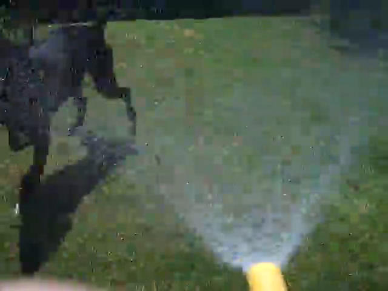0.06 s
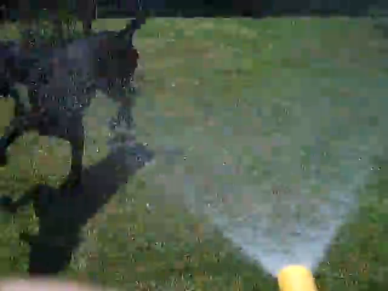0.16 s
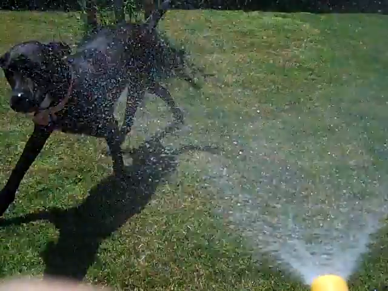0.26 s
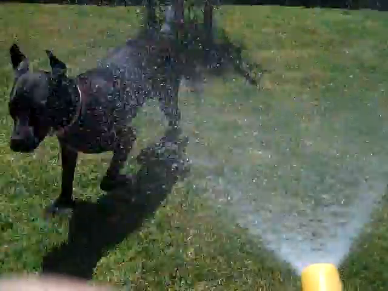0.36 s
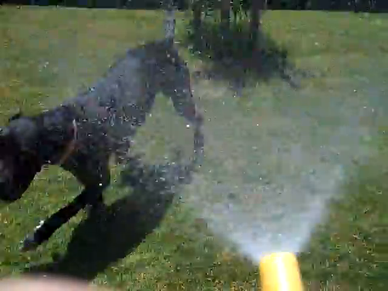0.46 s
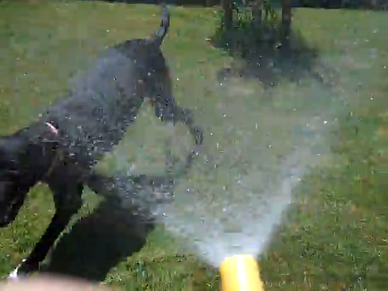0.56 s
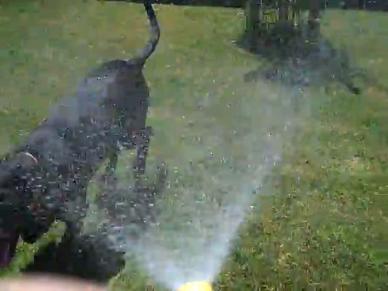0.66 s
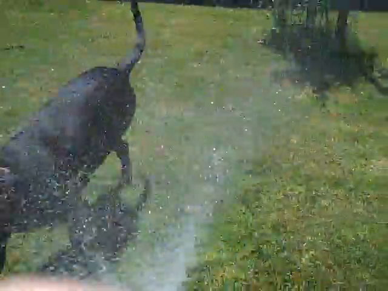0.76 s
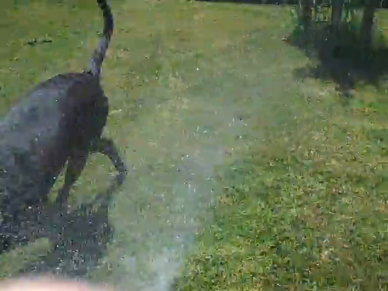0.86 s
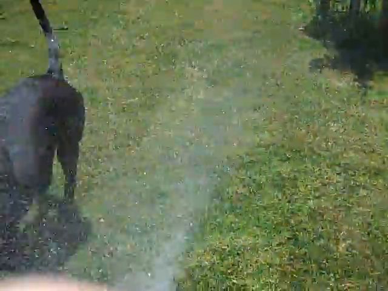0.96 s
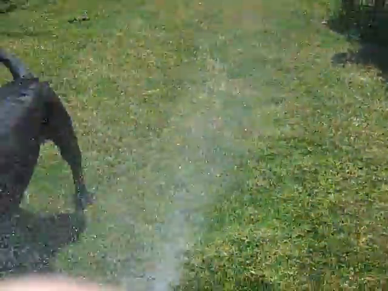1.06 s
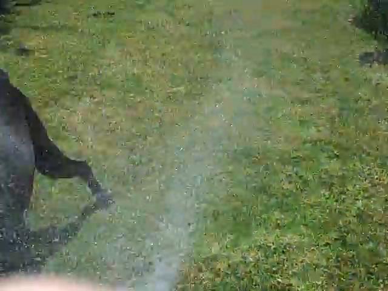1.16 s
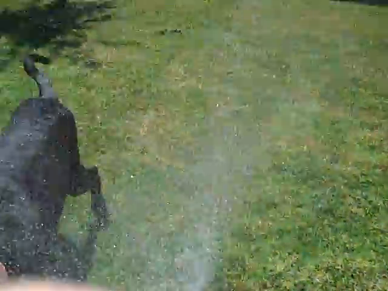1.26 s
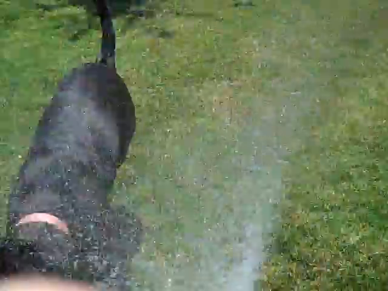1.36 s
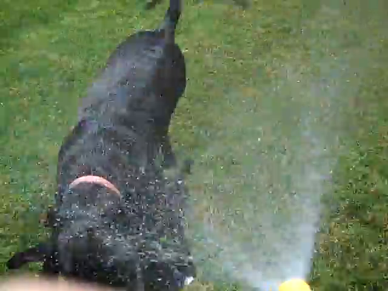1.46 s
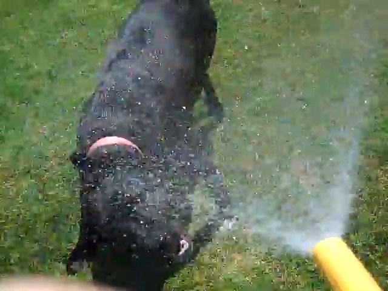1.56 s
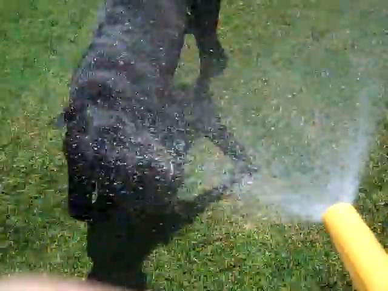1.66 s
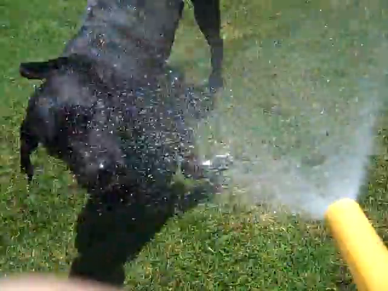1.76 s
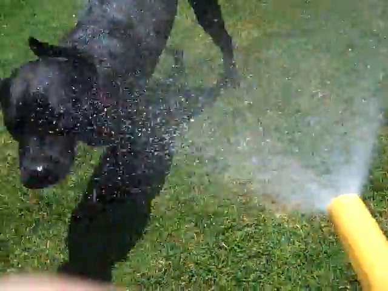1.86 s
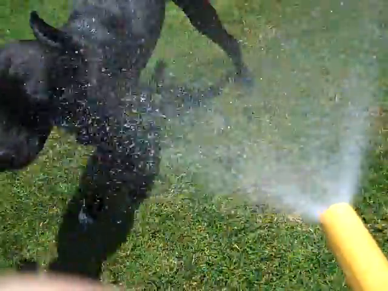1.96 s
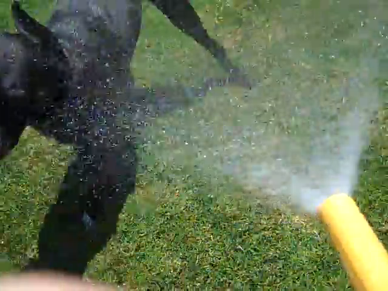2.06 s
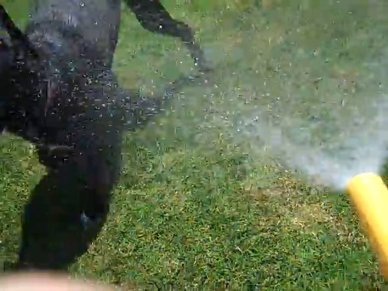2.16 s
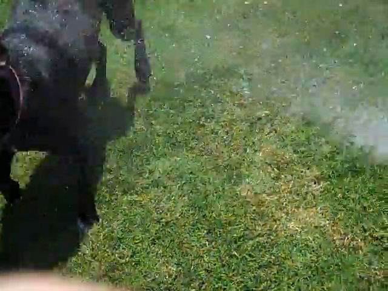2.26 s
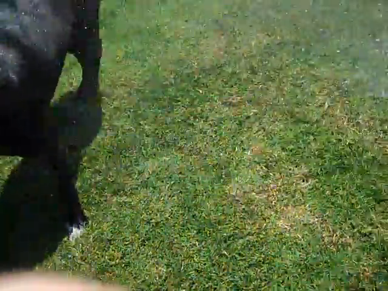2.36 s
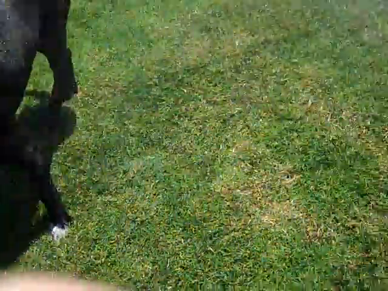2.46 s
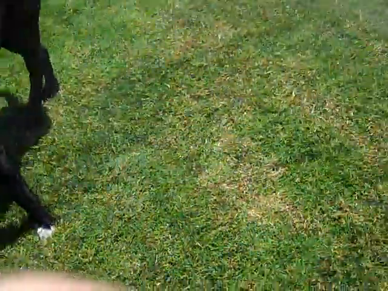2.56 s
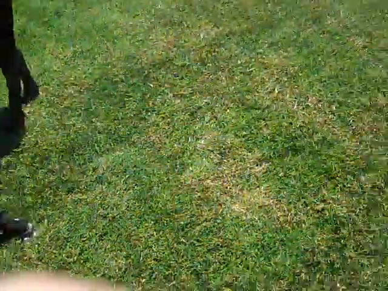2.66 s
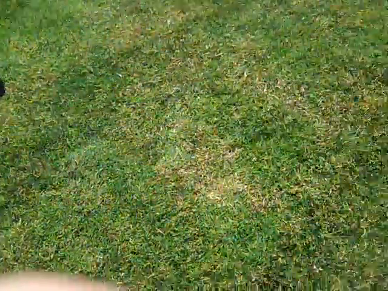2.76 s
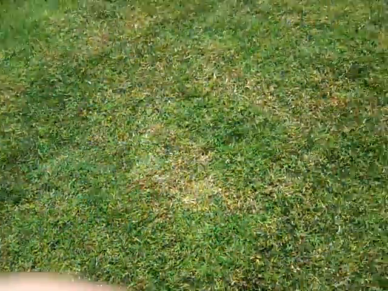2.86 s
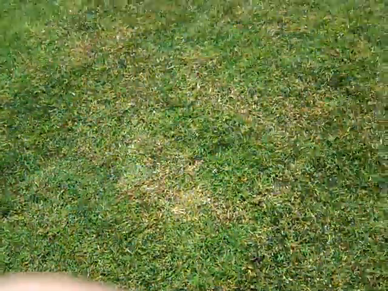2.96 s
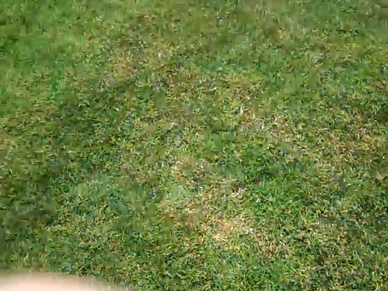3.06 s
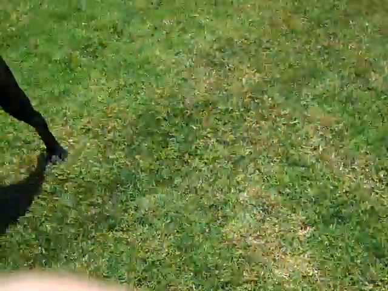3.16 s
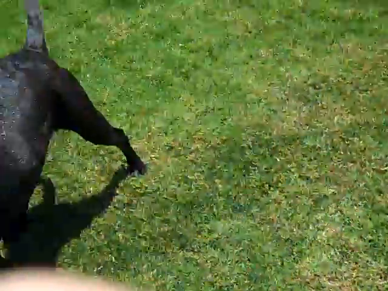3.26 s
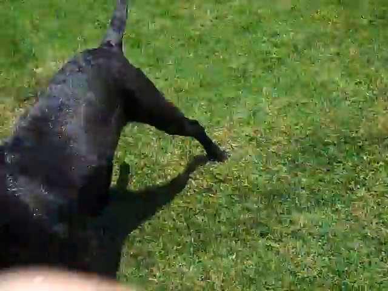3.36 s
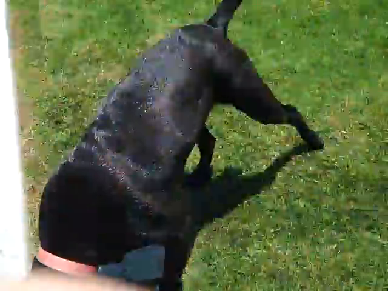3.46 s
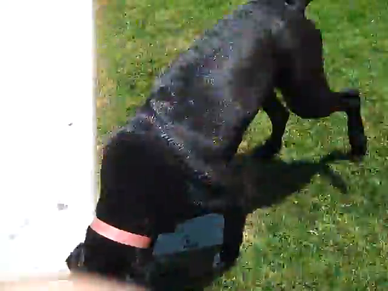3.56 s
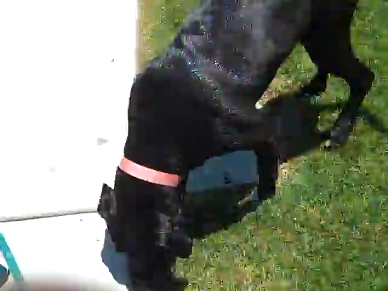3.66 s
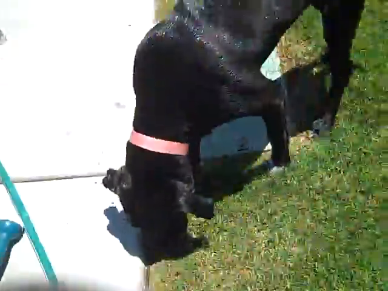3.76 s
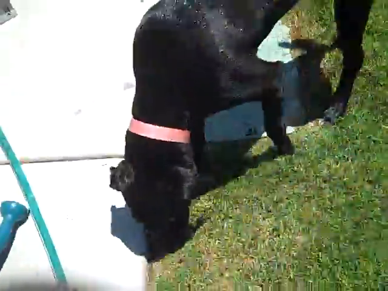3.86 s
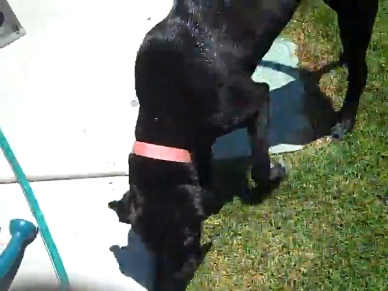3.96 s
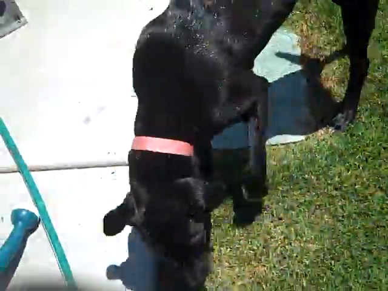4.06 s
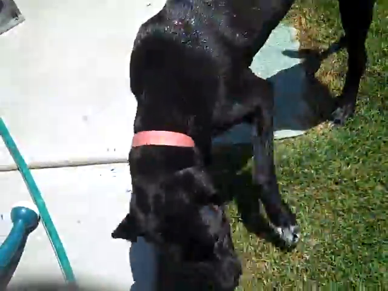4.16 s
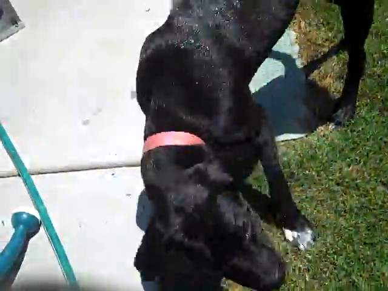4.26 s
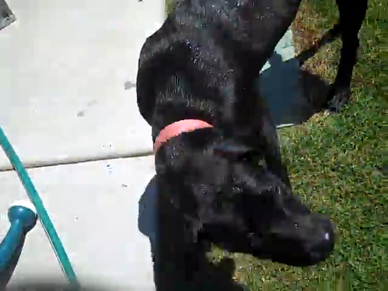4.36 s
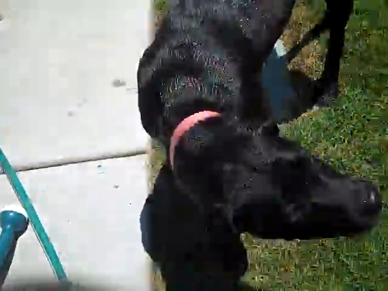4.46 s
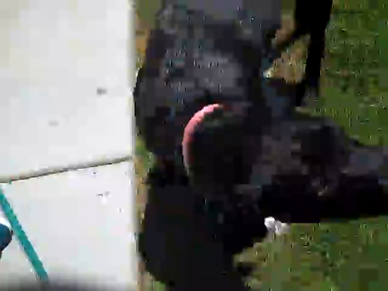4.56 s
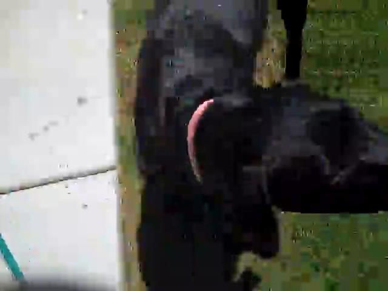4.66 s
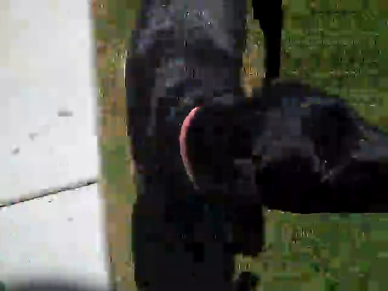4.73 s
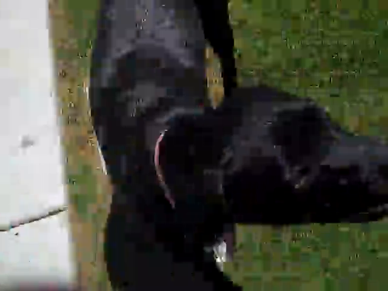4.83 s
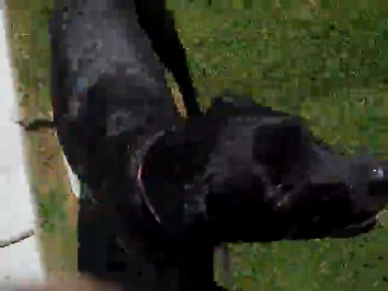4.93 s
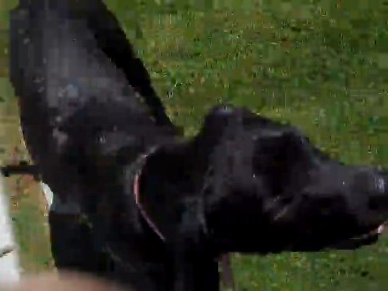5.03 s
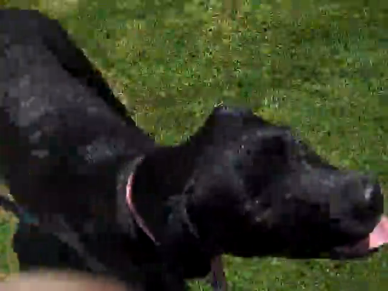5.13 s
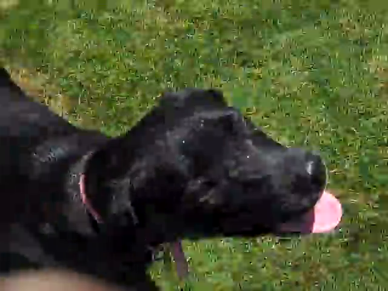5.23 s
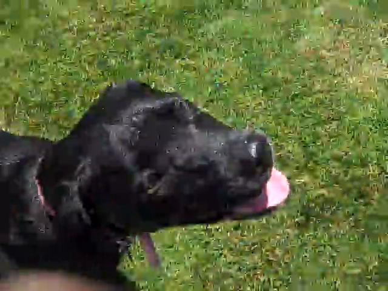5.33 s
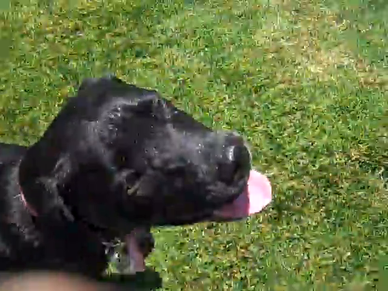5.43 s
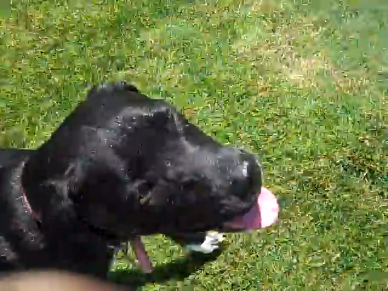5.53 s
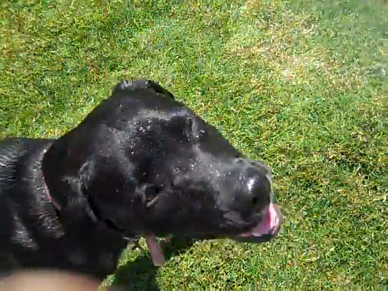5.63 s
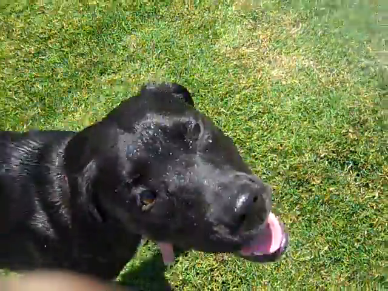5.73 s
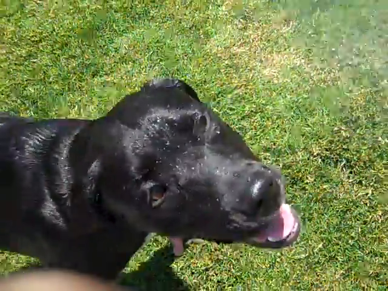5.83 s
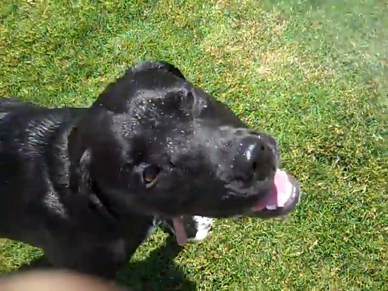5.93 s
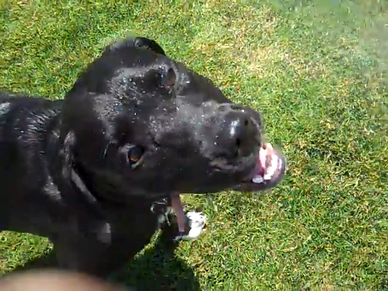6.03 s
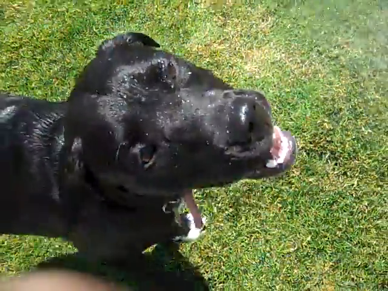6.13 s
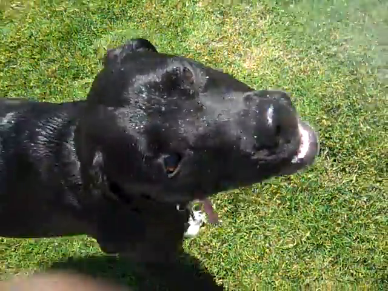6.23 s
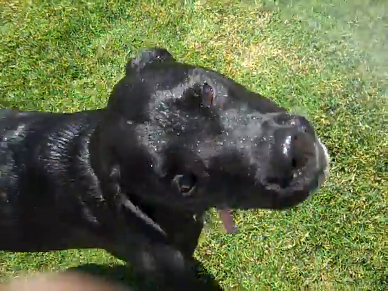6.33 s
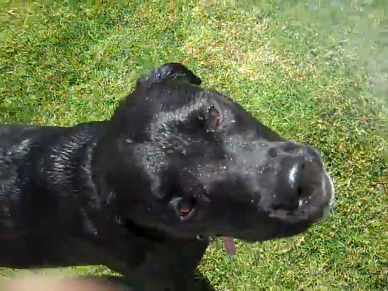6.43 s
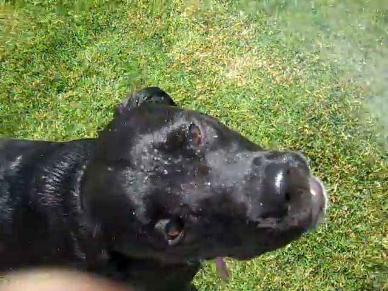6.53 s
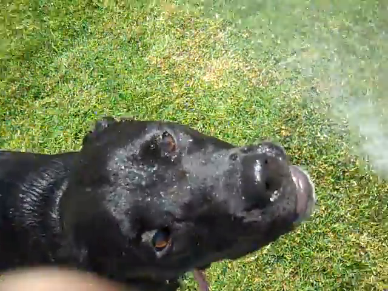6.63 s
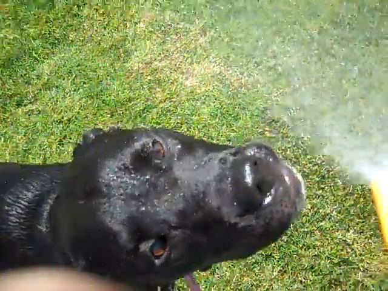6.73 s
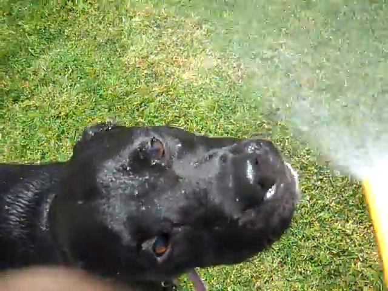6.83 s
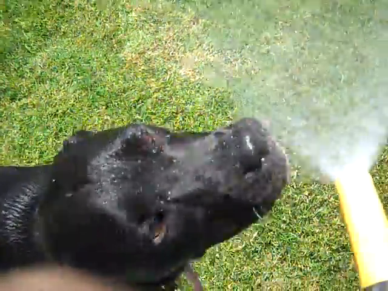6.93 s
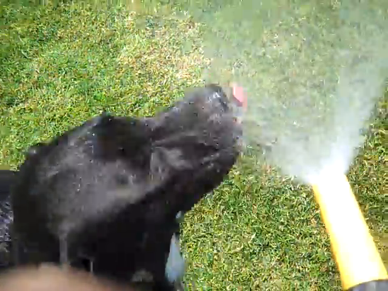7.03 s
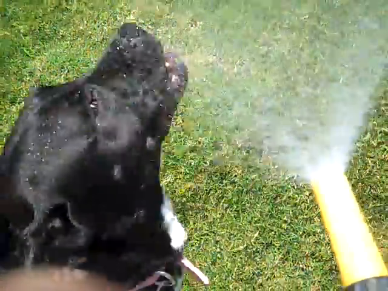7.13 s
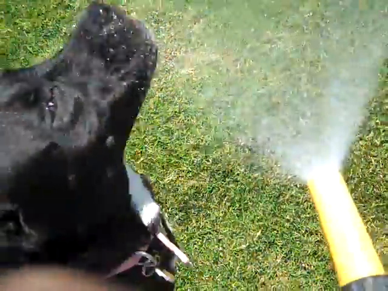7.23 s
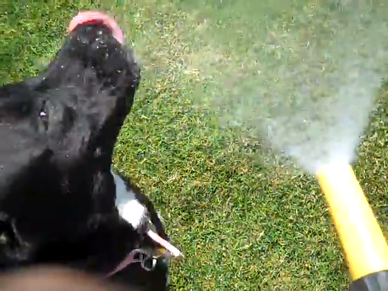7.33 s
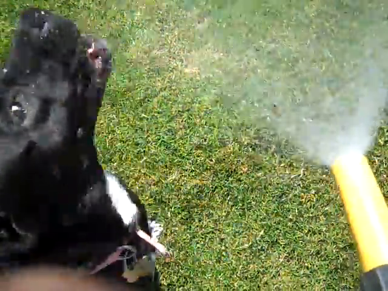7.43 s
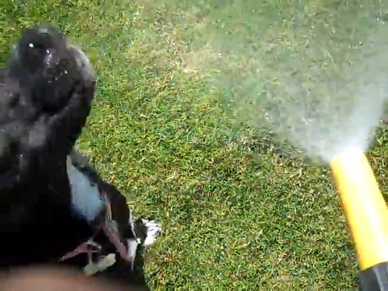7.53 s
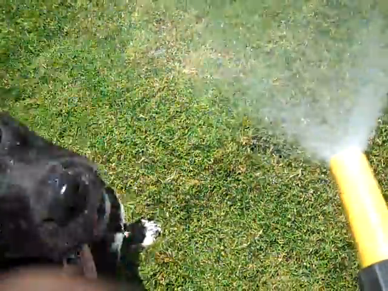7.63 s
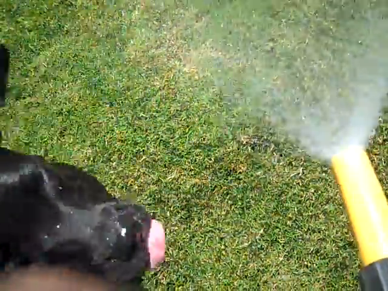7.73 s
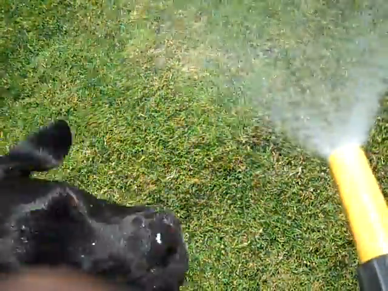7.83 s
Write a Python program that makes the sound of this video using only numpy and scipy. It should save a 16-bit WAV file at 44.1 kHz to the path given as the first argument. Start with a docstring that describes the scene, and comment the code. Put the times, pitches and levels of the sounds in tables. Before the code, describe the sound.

A garden hose sprays with a steady bright hiss, drops ticking and pattering on grass and a dog, over a low hum.

```python
"""Hosing the lawn and the dog

A hose nozzle sprays beside a small stereo camera, swings off to the right and comes back.
The jet hisses as it tears into mist. Drops patter on the grass and on a dog, which shakes its
ears and jingles its tag. A fan motor hums by the house. Each microphone port (its small opening)
rings at 7-8 kHz, which sharpens the hiss, and a limiter turns the sound down after loud drops."""
import sys
import numpy as np
from scipy import signal
from scipy.fft import rfft, irfft, next_fast_len
from scipy.io import wavfile
from scipy.ndimage import uniform_filter1d, map_coordinates

SR = 44100
rng = np.random.default_rng(int(sys.argv[2]) if len(sys.argv) > 2 else 0)


def wrap_up_sound(samples):
    """Save the sound to the file named by the first command line argument, as 16-bit audio."""
    columns = np.atleast_2d(samples).T
    # keep every value between -1 and 1, then stretch to whole-number steps
    tamed = np.clip(columns, -1, 1)
    steps = np.round(tamed * 32767).astype(np.int16)
    wavfile.write(sys.argv[1], SR, steps)


N = 347949
T = np.arange(N) / SR


# tone of the jet's bright hiss: f/Hz, level/dB
HISS_TONE = [(2500, -37), (4300, -16), (5800, -3), (6600, 1), (7400, 0.5), (8300, -0.5), (9300, -6.5),
             (10500, -19), (13000, -38)]
# tone of the deeper rush from the cone of spray: f/Hz, level/dB
RUSH_TONE = [(2400, -37), (3400, -37), (4450, -9.5), (4950, -2.5), (5400, 3.5), (6200, -2), (7200, -9),
             (9000, -6.5), (13000, -28)]
# tone of the fine mist: f/Hz, level/dB
MIST_TONE = [(6500, -44), (8000, -8), (9200, 1.5), (10500, 6), (11800, 6.5), (12800, 0), (14200, -19)]

def jet(jet_db, swing):
    """A sheet of water tears into mist at the nozzle; from the side, its cone adds a deeper rush."""
    lag_ms, pan_db = direction(swing)
    cone_lag_ms = 0.14 * swing ** 0.74  # the wide cone gets to the side sooner than the nozzle
    hiss = spray(HISS_TONE, lag_ms, 0.51 * pan_db, rate=14000, spread_db=2, scatter_db=-12.5)
    rush = spray(RUSH_TONE, cone_lag_ms, 1.03 * pan_db, rate=14000, spread_db=2.6, scatter_db=-9)
    mist = spray(MIST_TONE, lag_ms, 0.5 + 0.1 * pan_db, rate=9000, spread_db=2.5, scatter_db=-0.5)
    # the sheet flutters quickly, and the hiss gives way as the rush grows
    rush_lead = -5 + 6 * swing ** 2
    hiss *= gain(-2 - 0.38 * rush_lead + 0.59 * wobble(70))
    rush *= gain(0.2 + 1.4 * rush_lead + 0.82 * wobble(24.96))
    mist *= gain(-7.5 + 9 * swing + wobble(18))
    return (hiss + rush + mist) * gain(jet_db + 0.62 * wobble(30))


# tone of drops landing on grass: f/Hz, level/dB
PATTER_TONE = [(400, -14.5), (1200, -12), (1600, -7), (2100, -4.5), (2700, 1), (3050, -2), (3400, 0.5),
               (3900, -13), (4400, -49), (8000, -15)]
# tone of the cone's near edge: f/Hz, level/dB
SIZZLE_TONE = [(2600, -46.5), (3300, -5.5), (3750, 2.5), (4400, -1.5), (4900, 5.5), (5600, -20),
               (8000, -27)]

def lawn(jet_db, swing):
    """Drops patter far out on the grass while the near edge of the cone sizzles beside the camera."""
    _, pan_db = direction(swing)
    # off to the side, the patter is more scattered and the sizzle more direct
    patter = spray(PATTER_TONE, lag_ms=0.19 * swing ** 2, pan_db=0.13 * pan_db,
                   rate=7000, spread_db=1.5, scatter_db=-25 + 26 * swing)
    sizzle = spray(SIZZLE_TONE, lag_ms=0.122 * np.tanh(swing / 0.3), pan_db=0.035 * pan_db,
                   rate=9000, spread_db=2, scatter_db=-4 - 23 * swing)
    patter *= gain(-38.5 + 3.45 * swing + 0.98 * wobble(20))
    sizzle *= gain(-37 + 6.4 * swing + 2.6 * wobble(24))
    surge_db = jet_db - np.mean(jet_db)
    return (patter + sizzle) * gain(0.96 * surge_db)


# the spray hits the dog: t/s, length/s, level/dB
COAT_HITS = [(0.572, 0.033, -20), (0.612, 0.03, -27), (0.723, 0.016, -31), (1.93, 0.012, -31),
             (2.192, 0.012, -28), (2.578, 0.025, -31), (2.778, 0.03, -27.5), (2.818, 0.025, -29.5),
             (3.007, 0.027, -31.5), (3.332, 0.03, -33), (4.325, 0.04, -32), (4.865, .03, -31),
             (5.041, .02, -33), (7.187, 0.092, -30.5)]

def splashes(swing):
    """Bursts of big drops slap the dog's coat."""
    tone = [(500, -16.5), (1500, -12), (2100, -9), (2750, 3.5), (3600, -2),
            (5200, 1.5), (7200, 6.5), (9000, 1), (13000, -20)]  # f/Hz, level/dB
    bursts = sum(gain(db) * swell(t, length) for t, length, db in COAT_HITS)
    return bursts * spray(tone, *direction(swing), rate=5500, spread_db=2.1, scatter_db=-8)


# single drops landing close by: t/s, level/dB
CLOSE_DROPS = [(0.596, 0.5), (0.639, -4), (0.657, -9), (0.711, -15), (0.725, -4), (0.728, -4), (1.1018, -2),
               (1.857, 0.5), (2.189, -3), (2.536, -1.5), (2.585, 3.5), (2.7726, -1), (2.825, 2.5),
               (3.016, -32), (3.2823, -6.5), (3.337, 1), (3.864, -3), (3.9027, 0), (4.033, 1.5),
               (4.476, -0.5), (4.8718, -5), (5.0437, -2.5), (6.2058, -3), (6.4799, 1.5)]

def drops(swing):
    """Lone drops land near the microphone, each with one sharp tick."""
    ticks = np.zeros(N)
    for t, db in CLOSE_DROPS:
        ticks[int(t * SR)] = gain(db)
    tone = [(500, -32), (2500, -20), (6000, 5.5), (8000, 3), (10000, -3), (14000, -16)]  # f/Hz, level/dB
    return from_side(colour(ticks, tone), *direction(swing))


# ear slaps as the dog shakes its head: t/s, level/dB, f/Hz (strongest), length/s
EAR_SLAPS = [(1.109, -30.5, 1150, .004), (1.203, -29.5, 440, .005), (1.256, -42, 450, .008),
             (1.295, -36, 2200, .01), (1.305, -41, 450, .008), (1.402, -39.5, 460, .006),
             (1.499, -30.5, 2300, .008), (1.514, -34, 350, .009)]

def ears():
    """Wet ears flap, each slap a tap inside a short spatter, while the coat rustles."""
    slaps = np.zeros(N)
    for t, db, hz, length in EAR_SLAPS:
        burst = swell(t, length)
        tap = unit(signal.unit_impulse(N, int(t * SR)))
        spatter = unit(rng.standard_normal(N) * burst)
        slap = colour(tap + 0.7 * spatter, [(hz / 5, -11), (hz, 0), (hz * 2, -9), (hz * 6, -32)])
        slaps += gain(db) * slap * np.sqrt(np.sum(burst ** 2) / np.sum(slap ** 2))
    coat_tone = [(120, -9), (300, -4), (460, 1), (700, -6), (1200, -8), (3500, -20)]  # f/Hz, level/dB
    rustle = unit(colour(impacts(rate=900, spread_db=2.2), coat_tone))
    return slaps + rustle * swell(t=1.25, length=0.71) * gain(-49.5 + 3.2 * wobble(25.9))


# clinks of the collar tag: t/s, length/s, level/dB
TAG_CLINKS = [(1.16, .007, -26), (1.345, .008, -37), (1.366, .01, -32), (1.734, .025, -39)]
# the notes the tag rings at: f/Hz, level/dB
TAG_NOTES = [(13100, 7), (14080, 3)]

def tag():
    """The metal tag on the collar jingles thinly, mostly on the left."""
    rattle = sum(gain(db) * swell(t, length) for t, length, db in TAG_CLINKS)
    ring = sum(gain(db) * np.sin(2 * np.pi * hz * T + 1.6 * wobble(600)) for hz, db in TAG_NOTES)
    return rattle * ring * np.array([[1], [0.45]])


def bump(t=4.898, length=0.013, hz=140, db=-27):
    """A dull knock on the camera body, about two slow vibrations long."""
    return -gain(db) * swell(t, length) * np.cos(2 * np.pi * hz * (T - t))


def drone(t=3.24, length=1.0, hz=112, db=-50):
    """A low drone swells and fades once."""
    return gain(db) * swell(t, length) * np.sin(2 * np.pi * hz * T + 1.2 * wobble(20))


# the fan's hum as the camera nears it and leaves: t/s, level/dB
HUM_LEVEL = [(0.0, -54.5), (0.72, -63.5), (1.76, -51.5), (3.43, -49.5), (3.47, -45), (3.8, -37.5),
             (4.81, -39.5), (5.45, -45.5), (7.6, -48), (7.89, -48.5)]
# tone of the air noise from the fan and the yard: f/Hz, level/dB
AIR_TONE = [(20, -11), (42, -1), (70, 4), (120, 2.5), (200, -0.5), (400, -1), (700, -0.5), (1000, 1.5),
            (1400, -17), (2500, -12)]

def motor(blade_hz=271.25, shaft_hz=57.2):
    """A fan's blades hum, its shaft drones and the air rushes, all louder near the house."""
    hum_db, = curves(HUM_LEVEL)
    nearness = uniform_filter1d(hum_db, SR // 2) - np.mean(hum_db)
    hz = blade_hz + np.interp(T, [5.45, 5.8], [0, 1.35])  # the pitch steps up a little, once
    phase = 2 * np.pi * np.cumsum(hz) / SR + 0.074 * wobble(9.8)
    blades = (np.sin(phase) + gain(-24) * np.sin(3 * phase)) * gain(hum_db + 0.23 * wobble(5.4))
    shaft = np.sin(2 * np.pi * shaft_hz * T + 0.4 * wobble(4.4))
    shaft *= gain(-56.5 + 0.27 * nearness + 2 * wobble(2.95))
    middle, sides = (unit(colour(rng.standard_normal(N), AIR_TONE)) for _ in range(2))
    # an echo off the ground hollows out the air noise near 1 kHz
    middle = unit(middle + 0.3 * delay(middle, 0.48 - 0.012 * nearness))
    air = middle + gain(-22) * sides * np.array([[1], [-1]])
    air *= gain(-45 + 0.23 * nearness + 0.63 * wobble(6))
    # the draught rumbles on each port separately
    rumble_tone = [(20, -20), (55, -7), (120, -11), (300, -12), (2000, -52)]  # f/Hz, level/dB
    rumble = unit(colour(rng.standard_normal((2, N)), rumble_tone))
    rumble *= gain(-59 + 0.5 * nearness + 0.71 * wobble(4.4))
    return np.sqrt(2) * (blades + shaft) + air + rumble


# an echo off something close by, changing as the nozzle swings: t/s, delay/ms, strength/0-1
ECHO_PATH = [(0, .47, .07), (1.45, .49, .06), (1.8, .55, .19), (2.2, .56, .17), (2.75, .66, .3),
             (3.05, .61, .38), (3.28, .58, .45), (3.41, .5, .68), (3.52, .43, .6), (3.62, .35, .42),
             (3.72, .26, .38), (3.85, .215, .4), (4.2, .22, .33), (4.55, .2, .42), (4.8, .225, .33),
             (5.0, .275, .3), (5.3, .32, .3), (6.1, .33, .22), (6.8, .39, .15), (7.89, .39, .14)]
# that small, soft object lets the lows go by and swallows the finest sizzle: f/Hz, level/dB
ECHO_TONE = [(1500, -12), (2700, -5), (4200, 1), (7600, 0), (9200, -6), (11000, -14)]

def bounce(pair, swing, depth):
    """A very quick echo cancels some pitches and lifts others, so the moving spray swishes."""
    right_ms, strength = curves(ECHO_PATH)
    left_ms = right_ms * (1 - 0.15 * hidden(swing) ** 2)
    left, right = colour(pair, ECHO_TONE)
    echo = np.array([delay(left, left_ms), delay(right, right_ms)])
    return blend(pair, echo, depth * strength)


# what reaches the left port around the camera body: f/Hz, level/dB
SHADOW_TONE = [(1000, 3), (2000, -4.5), (3400, -1), (4300, -4), (5200, 6.5), (6400, 8), (7800, 3),
               (9200, -10.5), (11500, -18.5)]

def shadow(pair, swing):
    """The camera body dulls the water on the left as the nozzle swings behind it."""
    left, right = pair
    share = hidden(swing)
    return np.array([(1 - share) * left + share * colour(left, SHADOW_TONE), right])


def hidden(swing):
    """How much the camera body hides the nozzle from the left port, from 0 to 1."""
    return np.clip((swing - 0.66) / 0.26, 0, 1)


def direction(swing):
    """The nozzle's sound at the left port compared with the right: lag in ms, level in dB."""
    return 0.15 * swing, -0.5 - 12 * swing


def from_side(mono, lag_ms, pan_db):
    """Make a left-right pair: a sound from the right reaches the left port later and weaker."""
    gains = gain(np.array([pan_db, -pan_db]) / 2)
    return np.array([delay(mono, lag_ms), mono]) * gains / np.sqrt(np.mean(gains ** 2, axis=0))


def spray(tone, lag_ms, pan_db, rate, spread_db, scatter_db):
    """A cloud of droplets from one direction, plus scattered sound that differs at each port."""
    direct, *scattered = (unit(colour(impacts(rate, spread_db), tone)) for _ in range(3))
    return blend(from_side(direct, lag_ms, pan_db), np.array(scattered), gain(scatter_db))


def impacts(rate, spread_db):
    """About `rate` random clicks a second, many small and a few large."""
    size = gain(spread_db * np.minimum(rng.exponential(size=N), 6))
    hits = rng.random(N) < rate / SR
    return unit(hits * size * rng.choice([-1, 1], N))


def wobble(rate):
    """A smooth random wander of roughly plus or minus 1, with `rate` new values a second."""
    hold = max(int(SR / rate), 1)
    steps = np.repeat(rng.standard_normal(N // hold + 1), hold)
    return 1.3 * uniform_filter1d(uniform_filter1d(steps, hold), hold)[:N]


def swell(t, length):
    """A bell-shaped rise and fall around time t."""
    return np.exp(-np.minimum((2 * (T - t) / length) ** 2, 50))


def colour(x, tone):
    """Turn pitches up or down along a list of points: f/Hz, level/dB."""
    hz, db = np.transpose(tone)
    return filtered(x, lambda f: gain(np.interp(np.log(f), np.log(hz), db)))


def filtered(x, response):
    """Multiply each frequency f in a sound by response(f)."""
    size = next_fast_len(x.shape[-1] + 2048, True)
    hz = np.linspace(1e-3, SR / 2, size // 2 + 1)
    return irfft(rfft(x, size) * response(hz), size)[..., :x.shape[-1]]


def delay(x, lag_ms):
    """Make a sound arrive later, by an amount that may keep changing."""
    return map_coordinates(x, [np.arange(N) - lag_ms * SR / 1000], order=3, mode="nearest")


def blend(x, extra, share):
    """Mix in a share of another sound, keeping about the same loudness."""
    return (x + share * extra) / np.sqrt(1 + share ** 2)


def curves(table):
    """Join a table's rows with straight lines in time, one curve for each value column."""
    times, *columns = np.transpose(table)
    return [np.interp(T, times, column) for column in columns]


def gain(db):
    """Turn decibels into a number to multiply by."""
    return 10 ** (np.asarray(db) / 20)


def unit(x):
    """Scale a sound to an average (rms) level of 1."""
    return x / np.sqrt(np.mean(x ** 2))


# strength of the jet at the camera: t/s, level/dB
JET_LEVEL = [(0, -30.5), (0.55, -28.5), (0.68, -31.5), (0.79, -31.5), (1.02, -28.5), (1.2, -30),
             (1.28, -28), (1.85, -28.5), (2.0, -30.5), (2.5, -28.5), (3.15, -30), (3.42, -33.5),
             (3.65, -30), (5.1, -30.5), (5.7, -29.5), (6.7, -28.5), (7.89, -28.5)]
# where the nozzle points: t/s, swing/0-1 (0 is ahead, 1 is far right)
NOZZLE_AIM = [(0, 0.04), (0.5, 0.23), (0.8, 0.012), (1.3, 0.012), (1.7, 0.21), (2.2, 0.18), (2.8, 0.58),
              (3.15, 0.67), (3.4, 0.76), (3.75, 0.84), (4.7, 0.81), (5.1, 0.71), (5.7, 0.53), (7.1, 0.22),
              (7.89, 0.21)]

def scene():
    """All the water follows the aim of the nozzle; the dog and the background are added to it."""
    jet_db, = curves(JET_LEVEL)
    swing, = curves(NOZZLE_AIM)
    near = bounce(jet(jet_db, swing), swing, depth=1)
    far = bounce(lawn(jet_db, swing), swing, depth=0.6)
    water = shadow(near + far + splashes(swing), swing)
    return water + drops(swing) + tag() + ears() + bump() + drone() + motor()


def limiter(pair, limit_db=1.33, attack_s=0.0046, release_db_per_s=37.5):
    """A peak over the limit turns both sides down together; the volume then climbs back steadily."""
    peak_db = 20 * np.log10(np.abs(pair).max(axis=0) + 1e-9)
    over_db = np.maximum(peak_db - limit_db, 0)
    climb_db = release_db_per_s * T
    cut_db = np.maximum.accumulate(over_db + climb_db) - climb_db
    smoothing = np.exp(-1 / (attack_s * SR))
    return pair * gain(-signal.lfilter([1 - smoothing], [1, -smoothing], cut_db))


# how the ports ring, left then right: f/Hz, width/Hz
PORT_RINGS = [(7894, 950), (7126, 1340)]
# the right port is duller in the highs: f/Hz, level/dB
RIGHT_PORT_TONE = [(1000, 1.03), (4000, -1.5), (6700, 4.5), (7700, -4.5), (10000, -4), (12000, -11.5),
                   (14000, -4)]

def record(dry, top_hz=14150):
    """Each port rings like a tiny bottle; loud peaks are limited and flattened, the top highs cut."""
    left, right = (filtered(x, lambda f: 1 / (1 - (f / hz) ** 2 + 1j * f * width / hz ** 2))
                   for x, (hz, width) in zip(dry, PORT_RINGS))
    pair = np.array([left, colour(right, RIGHT_PORT_TONE)])
    limited = np.clip(limiter(pair), -1, 1)
    return signal.sosfilt(signal.ellip(10, 0.2, 80, top_hz, fs=SR, output="sos"), limited)


dry = scene()
out = record(dry)
wrap_up_sound(out)
```